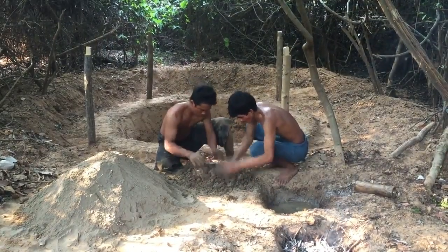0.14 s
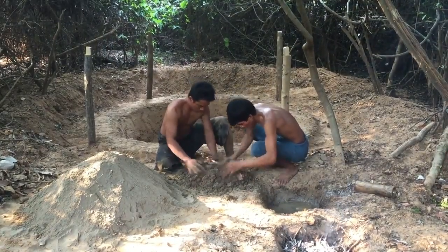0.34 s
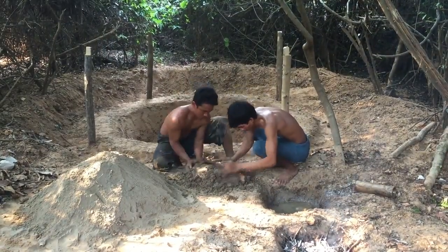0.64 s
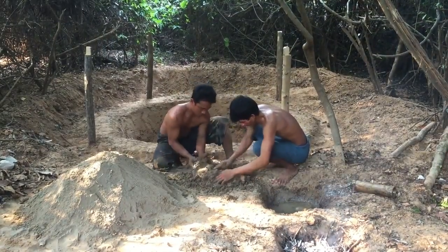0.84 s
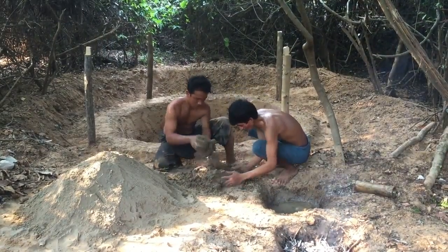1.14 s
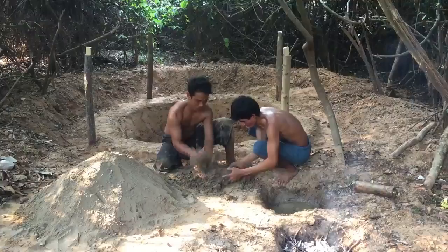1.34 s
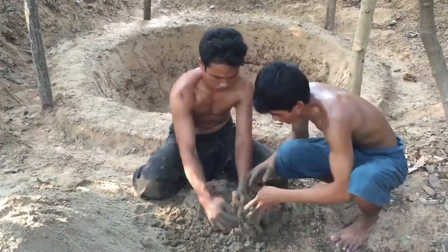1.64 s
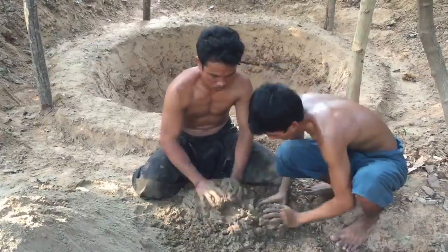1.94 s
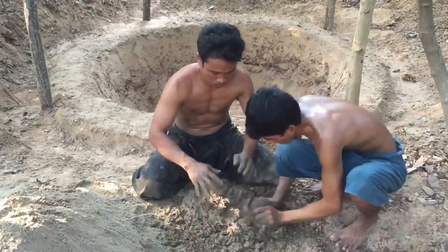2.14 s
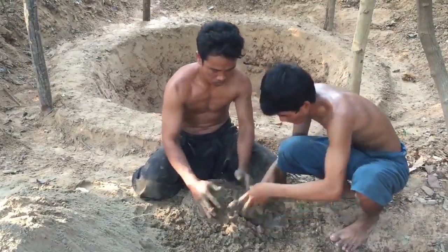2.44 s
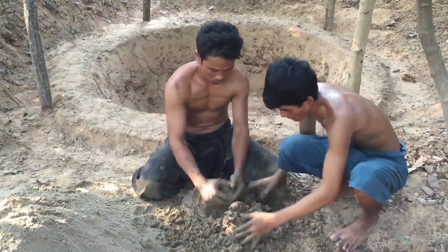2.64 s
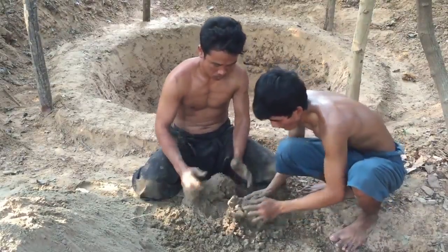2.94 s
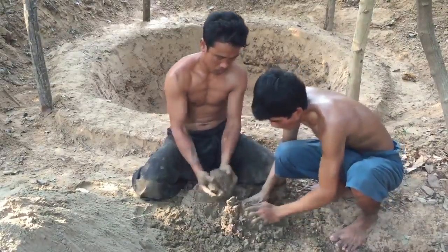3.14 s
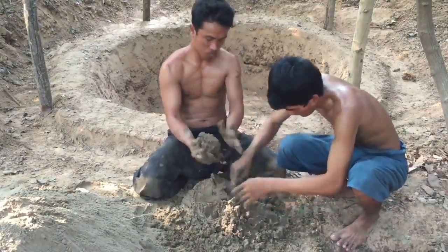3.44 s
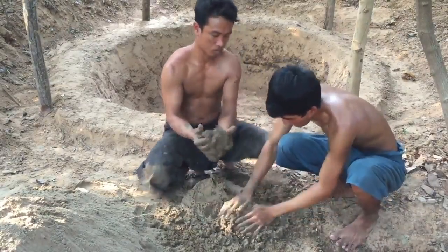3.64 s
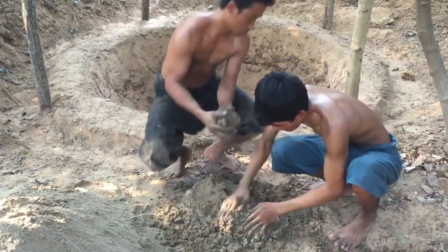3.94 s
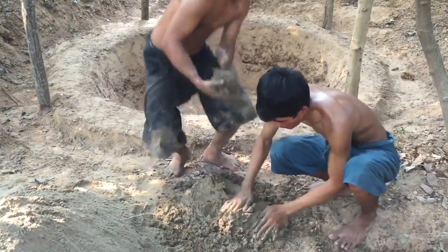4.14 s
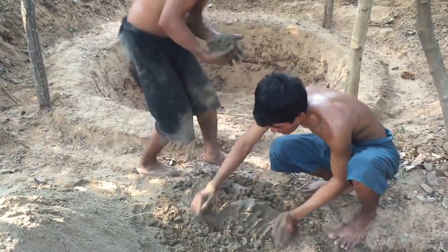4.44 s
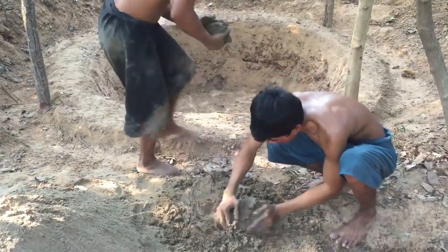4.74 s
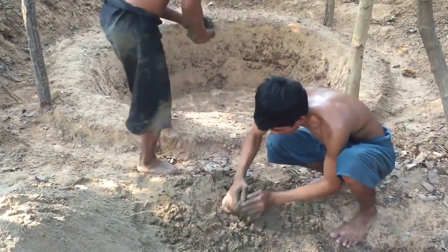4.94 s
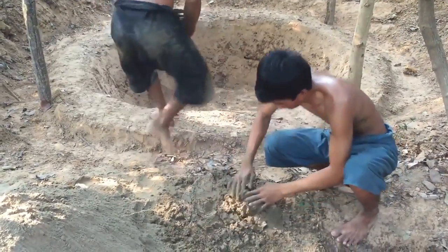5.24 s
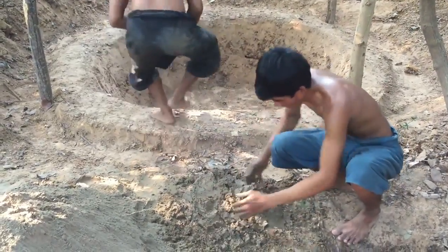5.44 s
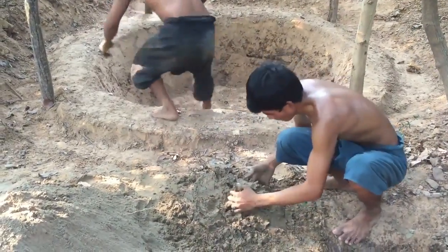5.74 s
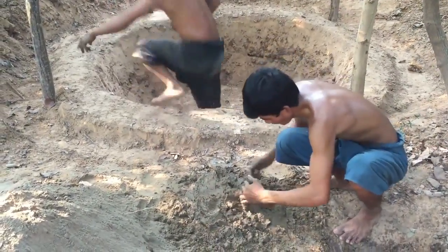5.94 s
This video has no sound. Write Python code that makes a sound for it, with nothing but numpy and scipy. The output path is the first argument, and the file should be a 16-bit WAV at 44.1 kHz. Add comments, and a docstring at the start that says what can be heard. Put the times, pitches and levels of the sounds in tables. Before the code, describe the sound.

Several heavy wet smacks open abruptly, each popping trapped air over a dull thud with a brief spray of grit. A tiny dropout follows, then soft kneading, a very loud double-edged slap, crumbling mud, and three more pats before the activity thins to rubbing. Cricket trills, thin distant bird whistles and a passing fly sit behind, in a quiet forest clearing with little echo, heard by one simple microphone.

```python
"""Hands slapping wet mud in a forest clearing

Each slap is a few skin contacts that pop air pockets, smack and crack, over a thump of lump and ground
with slosh and spray. Between slaps fingers knead and rub (flickering noise), crumbs fall and grit ticks.
A cricket chirps in bouts, far birds whistle and a fly passes (gliding tones), over a wash of insects,
leaves and low murmur (coloured noise). The sound drops out briefly once."""
import sys
import numpy as np
from scipy import signal
from scipy.fft import rfft, irfft, next_fast_len
from scipy.io import wavfile
from scipy.ndimage import uniform_filter1d, map_coordinates

SR = 44100
rng = np.random.default_rng(int(sys.argv[2]) if len(sys.argv) > 2 else 0)


def digitize_waveform(pressure):
    """Quantize a signal to 16-bit integers and store it at the path in sys.argv[1].

    Rows of a 2-D input are taken as channels; values are limited to [-1, 1].
    """
    field = np.atleast_2d(pressure).T
    bounded = np.clip(field, -1, 1)
    quanta = np.round(bounded * 32767).astype(np.int16)
    wavfile.write(sys.argv[1], SR, quanta)


N = 268128  # samples


def amp(db):
    """dB to gain."""
    return 10 ** (np.asarray(db) / 20)


def unit(x):
    """Scaled to rms 1."""
    return x / np.sqrt(np.mean(x ** 2) + 1e-20)


def curves(rows, t):
    """Each column after the time, interpolated at times t."""
    s, *columns = np.transpose(rows)
    return [np.interp(t, s, column) for column in columns]


def add(track, s, sound):
    """Mixes a sound in at time s."""
    part = track[round(s * SR):][:len(sound)]
    part += sound[:len(part)]


def wobble(rate_hz, size=N):
    """Smooth random curve through rate_hz knots a second."""
    knots = rng.standard_normal(int(size * rate_hz / SR) + 4)
    return map_coordinates(knots, [np.arange(size) * rate_hz / SR])


def noise(spectrum, size=N, grit_db=0):
    """Coloured noise of rms 1; grit_db makes it a stream of uneven grains."""
    freq_hz, density_db = np.transpose(spectrum)
    m = next_fast_len(size + 512)
    grains = rng.standard_normal(m) * amp(grit_db * wobble(700, size=m))
    log_hz = np.log(np.fft.rfftfreq(m, 1 / SR) + 1)
    gain = amp(np.interp(log_hz, np.log(freq_hz), density_db, -120, -120))
    return unit(irfft(rfft(grains) * gain, m)[:size])


def swell(t, rise_s, t60_s):
    """Envelope with top 1: soft rise, exponential fall."""
    envelope = (1 - np.exp(-t / max(rise_s, 1e-4))) * amp(-60 * t / max(t60_s, 1e-3))
    return envelope / envelope.max()


def bump(t, at_s, lead_s, fall_s):
    """Envelope with top 1 at at_s: exponential growth before, exponential fall after."""
    return np.exp(np.minimum((t - at_s) / max(lead_s, 1e-4), (at_s - t) / max(fall_s, 1e-4)))


def burst(sound, shape):
    """A sound under an envelope, always with the envelope's energy."""
    return unit(sound * shape) * np.sqrt(np.mean(shape ** 2))


def patchy(x, depth_db):
    """Random gain patches in time and frequency."""
    z = signal.stft(x, nperseg=256)[2]
    across_bins = uniform_filter1d(rng.standard_normal(z.shape), 5, 0)
    field = uniform_filter1d(across_bins, 10, 1)
    return unit(signal.istft(z * amp(depth_db * unit(field)), nperseg=256)[1][:len(x)])


def leaves(x, wet_db, t60_s):
    """Scattered echoes among the trees: a decaying noise tail added to the direct sound."""
    t = np.arange(SR // 3) / SR
    tail = rng.standard_normal(len(t)) * swell(t, 0.0066, t60_s)
    return x + amp(wet_db) * signal.fftconvolve(x, tail / np.linalg.norm(tail))[:N]


def glide(row, edge_db, overtones_db, blur, flutter_db):
    """Unsteady tone that swells to its top and fades, its pitch sliding through three values."""
    t = np.arange(row[0], row[2], 1 / SR)
    pitch_hz = np.interp(t, row[:3], row[3:6])
    level_db = row[6] + np.interp(t, row[:3], [edge_db, 0, edge_db])
    phase = 2 * np.pi * np.cumsum(pitch_hz * (1 + blur * wobble(149, size=len(t)))) / SR
    tone = sum(amp(db) * np.sin((k + 1) * phase) for k, db in enumerate(overtones_db))
    fade = np.clip(np.minimum(t - t[0], t[-1] - t) / 0.011, 0, 1)
    return np.sqrt(2) * tone * fade * amp(level_db + flutter_db * wobble(65.7, size=len(t)))


# low murmur of air and ground: [time_s, level_db]
MURMUR = [(0, -72.5), (.2, -62.5), (.83, -63), (1.15, -69.5), (2.1, -69), (3.6, -69.5), (4.0, -67),
          (5.38, -71.5), (6.08, -69.5)]
# spectra of wash, far insects and murmur: [freq_hz, density_db]
WASH_SPECTRUM = [(290, -35), (500, -4), (988, -6), (1080, -3.5), (1210, -4.5), (2570, -9.5), (3060, -11),
                 (3810, -9.5), (4940, -9), (6060, -13), (9090, -14), (10400, -16), (11500, -14.5),
                 (14900, -13.5), (16000, -21.5)]
CICADA_SPECTRUM = [(4700, -26.5), (5050, -2), (5250, -1.5), (5600, -30.5)]
MURMUR_SPECTRUM = [(15, -41), (25, -3), (102, -0.5), (315, -7), (407, -8), (445, -15.5), (479, -13.5),
                   (900, -17.5), (1170, -47), (1980, -120)]


def forest():
    """Far insects and leaves as a nearly steady noise wash over a low murmur."""
    murmur_db, = curves(MURMUR, np.arange(N) / SR)
    wash = amp(-71.0 + .6 * wobble(3.2)) * noise(WASH_SPECTRUM)
    cicadas = amp(-82.5 + 2.5 * wobble(2.5)) * noise(CICADA_SPECTRUM)
    murmur = amp(murmur_db + 2.7 * wobble(14)) * noise(MURMUR_SPECTRUM)
    return wash + cicadas + murmur


# bird whistles: [start_s, loudest_s, end_s, start_hz, loudest_hz, end_hz, top_db]
WHISTLES = [(2.13, 2.15, 2.23, 3200, 3250, 3250, -68), (2.545, 2.57, 2.62, 3080, 3210, 3230, -59),
            (2.6, 2.65, 2.675, 3250, 3320, 3100, -61), (2.57, 2.635, 2.71, 3730, 3720, 3650, -63),
            (2.55, 2.62, 2.72, 1320, 1350, 1200, -74), (3.42, 3.515, 3.54, 3930, 3960, 3950, -77),
            (3.605, 3.662, 3.74, 2850, 3170, 3150, -64), (4.08, 4.25, 4.34, 1175, 1275, 1330, -71),
            (4.36, 4.5, 4.56, 3600, 3680, 3750, -76), (4.535, 4.565, 4.59, 3730, 3780, 3760, -67),
            (4.58, 4.612, 4.632, 3760, 3770, 3740, -68), (4.565, 4.605, 4.64, 3700, 3350, 2900, -68),
            (5.37, 5.52, 5.62, 3850, 3930, 3780, -74), (5.59, 5.635, 5.66, 3800, 3480, 3400, -75)]


def birds():
    """Far whistles: single gliding partials smeared by leaves."""
    out = np.zeros(N)
    for row in WHISTLES:
        add(out, row[0], glide(row, edge_db=-14, overtones_db=[0], blur=.018, flutter_db=3.5))
    return leaves(out, wet_db=0, t60_s=.12)


# fly passes, lowest heard wing tone: [start_s, loudest_s, end_s, start_hz, loudest_hz, end_hz, top_db]
FLY_PASSES = [(1.0, 1.18, 1.3, 112, 134, 134, -68), (3.12, 3.22, 3.37, 280, 272, 268, -67)]


def fly():
    """Wing beat: a blurred tone with two weaker overtones."""
    out = np.zeros(N)
    for row in FLY_PASSES:
        add(out, row[0], glide(row, edge_db=-7, overtones_db=[0, -9.5, -15.5], blur=.07, flutter_db=2.5))
    return out


# cricket bouts: [first_chirp_s, chirp_count, chirp_rate_hz, pitch_hz, level_db]
BOUTS = [(1.889, 11, 24, 4680, -59), (3.46, 8, 23.4, 4640, -59), (4.543, 10, 24.2, 4700, -59),
         (5.309, 13, 24.3, 4680, -61.5), (4.62, 5, 23.5, 5000, -71), (5.4, 5, 23.6, 5000, -67)]


def cricket():
    """Chirps of two short wing strokes, each sliding down through the wing's resonance."""
    out, t = np.zeros(N), np.arange(SR // 100) / SR
    for first_s, count, rate_hz, base_hz, db in BOUTS:
        for s in first_s + np.arange(count) / rate_hz:
            start = np.exp(-(s - first_s) / .04)  # a bout starts softer and lower
            pitch_hz = base_hz * (1.035 - 0.045 * start) - 35000 * t
            envelope = np.abs(np.sin(np.pi * t / t[-1])) ** 2
            stroke = np.sin(2 * np.pi * np.cumsum(pitch_hz) / SR) * envelope
            chirp_db = db - 3 * start
            add(out, s - .004, amp(chirp_db + rng.normal(0, 1.2)) * stroke)
            add(out, s + 0.0074, amp(chirp_db + rng.normal(0, 1.2) + 1.5) * stroke)
    return leaves(out, wet_db=-9, t60_s=.12)


# hand weight per slap: [start_s, lump_db, lump_hz, lump_t60_s, slosh_db, ground_db, spray_db, spray_t60_s]
SLAPS = [(.143, -24.5, 253, 0.084, -22.5, -27.5, -43.5, .3), (.345, -40, 173, 0.1, -39, -40.5, -47.5, .22),
         (.387, -22, 194, 0.066, -27, -28.5, -39.5, .27), (.618, -34.5, 124.5, .065, -31, -39, -40.5, .3),
         (.877, -36, 169, 0.065, -33.5, -33, -44.5, .22), (.887, -29, 124.7, 0.083, -36.5, -34.5, -46, .23),
         (1.46, -53.5, 111, 0.087, -73, -61, -75.5, .2), (1.549, -31, 208, 0.019, -36.5, -47, -58, .2),
         (1.676, -25, 185.6, 0.066, -32, -43, -44.5, .25), (2.072, -41, 177, 0.049, -53.5, -50.5, -51, .13),
         (2.435, -12, 170.6, 0.08, -24, -30.5, -39, .3), (3.406, -60, 215, .07, -72, -70, -68, .12),
         (3.792, -27, 225.4, 0.027, -30, -33, -41.5, .23), (4.012, -25, 212.7, .044, -33, -37, -44.5, .21),
         (4.23, -29.5, 195.6, 0.057, -38, -37.5, -45.5, .2), (4.844, -47, 200, 0.038, -55.5, -62, -72, .2)]
# steady finger work: [time_s, squelch_db, hiss_db]
KNEAD = [(0, -78, -79), (1.57, -77.5, -78.5), (1.61, -65, -61.5), (2.0, -68, -65), (2.4, -67, -67.5),
         (2.56, -69, -72.5), (2.64, -76.5, -79), (2.72, -63, -64.5), (3.05, -69, -67.5),
         (3.5, -68.5, -66.5), (3.63, -73.5, -82.5), (4.45, -80, -79), (4.76, -70.5, -71),
         (5.05, -64.5, -63.5), (5.26, -74, -75.5), (5.47, -83, -83.5), (5.71, -77.5, -76),
         (6.08, -65.5, -65.5)]
# palm drags or pulls off the mud: [full_level_s, hold_s, squelch_db, hiss_db]
RUBS = [(0.172, 0.019, -67, -62.5), (0.398, 0.032, -58, -54.5), (0.644, 0.032, -61, -65),
        (0.881, 0.047, -50, -59), (1.266, 0.016, -78.5, -81), (1.694, 0.032, -58.5, -57.5),
        (1.878, 0.021, -72, -65), (1.966, 0.029, -73, -64), (2.16, 0.042, -77, -62),
        (2.456, 0.083, -54.5, -54.5), (2.847, 0.038, -67.5, -63.5), (3.005, 0.021, -69.5, -57.5),
        (3.332, 0.021, -57, -61.5), (3.716, 0.025, -83.5, -71), (3.81, 0.096, -63.5, -59),
        (4.032, 0.097, -74.5, -58.5), (4.255, .03, -78, -64), (4.331, 0.033, -78, -63.5),
        (4.84, 0.014, -80, -74), (5.083, 0.022, -67, -62.5), (5.328, 0.11, -80.5, -71),
        (5.755, 0.021, -79, -75.5), (6.012, 0.013, -80, -68.5), (6.06, 0.011, -68.5, -76)]
# spectra of wet squelch and fine hiss: [freq_hz, density_db]
SQUELCH_SPECTRUM = [(600, -27.5), (1500, -2), (3200, 3), (5000, 0), (8000, -17)]
HISS_SPECTRUM = [(3000, -22.5), (6000, -3), (9000, -0.5), (10400, -5), (12500, -1.5), (15600, -2)]
RUB_RISE_S, RUB_FALL_S = .012, .022  # e-folding times
# faint noise swelling and fading around a slap: level against its spray, e-folding time
HALO_DB, HALO_S = -17.5, 0.011


def kneading():
    """Wet grit under fingers: squelch and hiss flicker, swell in each rub; faint noise surrounds each slap."""
    t = np.arange(N) / SR
    level = amp(curves(KNEAD, t))  # rows: squelch, hiss
    for s, hold_s, *rub_db in RUBS:
        decay = np.maximum((s - t) / RUB_RISE_S, (t - s - hold_s) / RUB_FALL_S)
        level = level + amp(rub_db)[:, None] * np.exp(-np.maximum(decay, 0))
    for s, *_, spray_db, _ in SLAPS:
        level = level + amp(spray_db + HALO_DB) * bump(t, s, HALO_S, HALO_S)
    squelch_gain, hiss_gain = level * amp(2.6 * wobble(42))
    squelch = squelch_gain * patchy(noise(SQUELCH_SPECTRUM, grit_db=2.5), depth_db=2.2)
    hiss = hiss_gain * patchy(noise(HISS_SPECTRUM, grit_db=2.5), depth_db=2.5)
    return squelch + hiss


# single grit grains snap, peak 1 ms after the time: [time_s, level_db]
TICKS = [(1.872, -53), (2.692, -57), (2.745, -60), (2.793, -55), (2.908, -56), (3.1, -58), (3.139, -55),
         (3.272, -57), (3.409, -48), (3.76, -53), (4.946, -59), (5.0, -57), (5.33, -62), (5.414, -61),
         (5.863, -61), (6.062, -52)]
# grit spectrum: [freq_hz, density_db]
GRIT_SPECTRUM = [(800, -20), (2000, -5), (5000, 0.5), (9000, -2), (15600, -8)]


def ticks():
    """Snapping grains: noise cracks about a millisecond long."""
    out, t, top_s = np.zeros(N), np.arange(SR // 50) / SR, .004
    for s, db in TICKS:
        snap = burst(noise(GRIT_SPECTRUM, size=len(t)), bump(t, top_s, .0004, .0012))
        add(out, s + .001 - top_s, amp(db) * snap)
    return out


# small clods drop or peel off, peak 4 ms after the time: [time_s, level_db, centre_hz, length_ms]
CRUMBS = [(.327, -58, 1800, 14), (1.89, -59, 3900, 50), (1.975, -59.5, 3700, 37), (2.147, -63, 3200, 19),
          (2.311, -52.5, 4630, 9.2), (2.538, -62, 3180, 16), (2.81, -57, 4200, 18.4),
          (2.846, -55.5, 4040, 11.4), (2.884, -61, 3020, 14), (3.09, -59.5, 2630, 9.2),
          (3.137, -61.5, 4320, 10), (3.321, -58, 3290, 16), (3.345, -55.5, 3340, 16),
          (3.893, -57, 3430, 16), (4.831, -63, 4780, 5.5), (5.024, -60.5, 3390, 26), (5.082, -64, 3380, 13),
          (6.048, -55.5, 2600, 19), (6.062, -60, 2800, 10)]


def crumbs():
    """Falling clods: short puffs of gritty noise around a centre frequency."""
    out, t, top_s = np.zeros(N), np.arange(SR // 6) / SR, .04
    for s, db, hz, ms in CRUMBS:
        puff = noise([(hz / 3, -16), (hz, 0), (7000, -11), (15600, -15)], size=len(t), grit_db=8)
        envelope = bump(t, top_s, 0.0003 * ms, 0.0006 * ms)
        add(out, s + .004 - top_s, amp(db) * puff * envelope)
    return out


# spectra of slosh and spray: [freq_hz, density_db]
SLOSH_SPECTRUM = [(70, -14.5), (150, -4.5), (320, 2.5), (600, -13), (1500, -21)]
SPRAY_SPECTRUM = [(180, -35.5), (300, -3), (418, -9.5), (978, 0), (3830, -1), (4990, -5.5), (6410, -5.5),
                  (13300, -13), (16000, -20)]
GROUND_HZ, GROUND_LATE_S = 64.3, .019  # ground tone, delay of its envelope's top


def slaps():
    """The lump wobbles and sloshes, the ground answers a little later, spray patters down."""
    out, t = np.zeros(N), np.arange(SR // 2) / SR
    u = t / GROUND_LATE_S
    ground = np.sin(2 * np.pi * GROUND_HZ * t) * (u * np.exp(1 - u)) ** 2.0
    for s, lump_db, lump_hz, lump_t60_s, slosh_db, ground_db, spray_db, spray_t60_s in SLAPS:
        lump = np.sin(2 * np.pi * lump_hz * t) * swell(t, 0.0045, lump_t60_s)
        slosh = burst(noise(SLOSH_SPECTRUM, size=len(t)), swell(t, 0.0045, t60_s=.07))
        patter = noise(SPRAY_SPECTRUM, size=len(t), grit_db=2.2) * amp(0.91 * wobble(60, size=len(t)))
        spray = patter * swell(t, 0.0031, spray_t60_s)
        thump = amp(lump_db) * lump + amp(ground_db) * ground
        add(out, s, thump + amp(slosh_db) * slosh + amp(spray_db) * spray)
    return out


# skin meets mud: [peak_s, contact_db, pocket_hz, crack_db, length_ms]
CONTACTS = [(0.1442, -21.5, 1487, -28.5, 3.7), (0.1468, -10, 621, -25.5, 2.5),
            (0.1514, -5.5, 591.2, -35.5, 3), (0.1527, -36, 490, -40.5, 4), (0.344, -26, 1292, -49, 2.54),
            (0.3506, -27, 979, -44.5, 3), (.368, -32.5, 411, -50, 4), (0.3836, -22, 1160, -35.5, 3),
            (.387, -10, 1110, -19, 2.5), (0.3884, -8.5, 606, -25.5, 2.5), (.393, -11.5, 876.5, -31.5, 4),
            (0.6183, -18, 1313, -23, 2), (0.6207, -17, 889.5, -17, 2.7), (0.6252, -17.5, 592, -31, 4.9),
            (.685, -40, 610, -60, 7), (.70, -43, 677, -65, 8.1), (0.8744, -16.5, 835.4, -34.5, 2.5),
            (0.8859, -14, 1501, -27, 4.4), (.888, -15, 807, -24.5, 3), (.893, -23, 507, -32, 4.14),
            (.898, -47, 880, -35, 3), (1.535, -44, 513, -56.5, 15), (1.5515, -27, 835, -43, 3),
            (1.6774, -20.5, 1383, -23, 2.7), (1.680, -9, 591, -17, 2.4), (1.683, -22.5, 684, -30, 5),
            (2.079, -60, 1570, -40, 8), (2.4334, -14, 1193, -28.5, 2.5), (2.4353, -6, 1801, -12.5, 4.5),
            (2.441, -5, 1910, -18.5, 4), (2.4428, -6.5, 508.5, -26, 3), (3.788, -32, 1070, -30.5, 3.4),
            (3.7916, -10.5, 999.7, -15.5, 3), (3.7961, -19, 686.7, -18.5, 3.3), (3.801, -21, 496, -37.5, 9),
            (4.008, -31, 1953, -27.5, 2), (4.012, -27.5, 674, -19, 3), (4.017, -15.5, 483, -21, 2.7),
            (4.036, -32, 1182, -42, 3.8), (4.232, -22, 604, -21.5, 4), (4.2417, -24.5, 715, -27.5, 4.5),
            (4.851, -51.5, 1475, -56, 3.2)]
# treble crack spectrum: [freq_hz, density_db]
CRACK_SPECTRUM = [(880, -27), (1500, -4.5), (3120, -7.5), (3630, -3.5), (4660, -9), (14300, -17),
                  (15900, -27), (16500, -51)]
POP_CYCLES = 1.3  # half-width of the pop is half this many cycles, to 1/e
POP_DB, SMACK_DB = -5.5, -6.5  # against contact_db


def contacts():
    """Each contact pops an air pocket for a wavering cycle or two, smacks, and cracks the wet film."""
    out, t, top_s = np.zeros(N), np.arange(SR // 12) / SR, .015
    for s, db, hz, crack_db, ms in CONTACTS:
        pitch_hz = hz * (1 + 0.12 * wobble(500, size=len(t)))
        pop_shape = np.exp(-((t - top_s) * hz * 2 / POP_CYCLES) ** 2)
        pop = np.sin(2 * np.pi * np.cumsum(pitch_hz) / SR) * pop_shape
        smack_noise = noise([(hz / 3.2, -14), (hz, 0), (hz * 3.4, -20)], size=len(t))
        smack = burst(smack_noise, bump(t, top_s, 0.00025 * ms, .0007 * ms))
        crack_noise = noise(CRACK_SPECTRUM, size=len(t), grit_db=4.0)
        crack = burst(crack_noise, bump(t, top_s, 0.00023 * ms, 0.00073 * ms))
        add(out, s - top_s, amp(db + POP_DB) * pop + amp(db + SMACK_DB) * smack + amp(crack_db) * crack)
    return out


def scene():
    """All sources at one microphone."""
    background = forest() + birds() + fly() + cricket()
    mud = kneading() + ticks() + crumbs() + slaps() + contacts()
    return (background + mud)[None]


# brief near-silence: [from_s, to_s]
GAP = (1.577, 1.606)
EDGE_HZ, TOP_HZ = 15800, 16800  # weak above the first, cut above the second


def record(dry):
    """The loudest peaks saturate softly; the level drops out in the gap; lows and top treble are cut."""
    t = np.arange(N) / SR
    gap_gain = np.clip(np.maximum(GAP[0] - t, t - GAP[1]) / 0.0029, .004, 1)
    squeezed = dry / (1 + np.abs(dry / .8) ** 4) ** .25
    m = next_fast_len(N + 8192)
    hz = np.fft.rfftfreq(m, 1 / SR)
    treble = np.where(hz < EDGE_HZ, 1, amp(-27.5)) * (hz < TOP_HZ)
    low_cut = 1 / (1 + (42 / (hz + 1)) ** 4)
    notch = amp(-4 * np.exp(-((hz - 10400) / 350) ** 2))  # the microphone's housing dips here
    return irfft(rfft(squeezed * gap_gain, m) * treble * low_cut * notch, m)[:, :N]


dry = scene()
out = record(dry)
digitize_waveform(out)
```